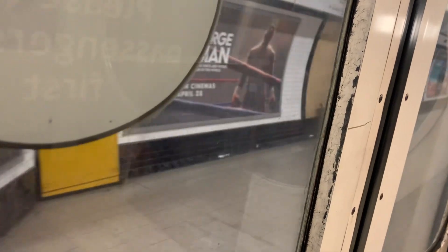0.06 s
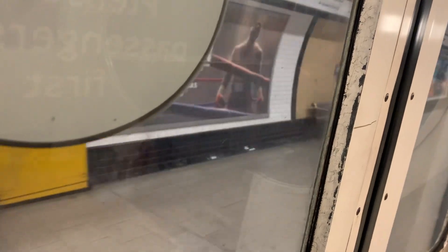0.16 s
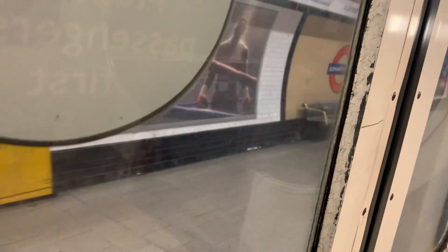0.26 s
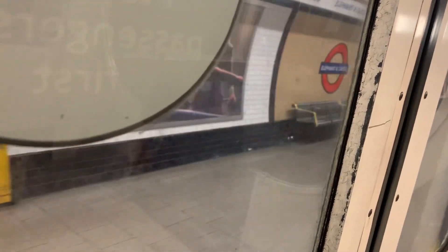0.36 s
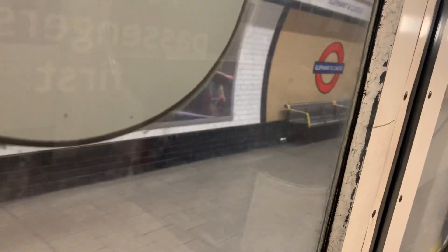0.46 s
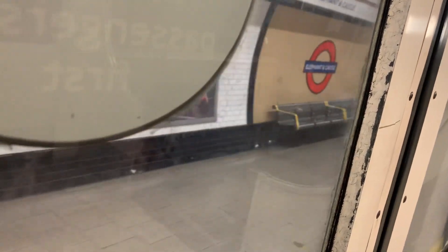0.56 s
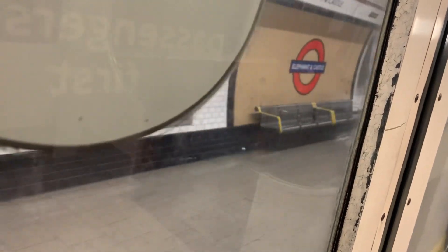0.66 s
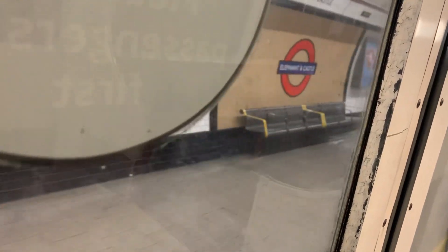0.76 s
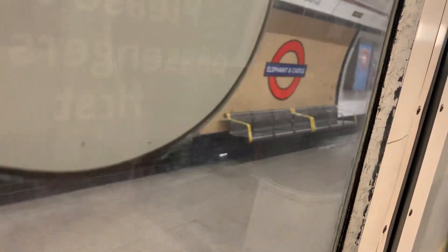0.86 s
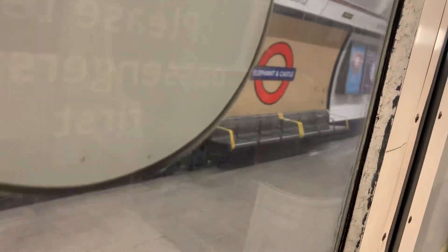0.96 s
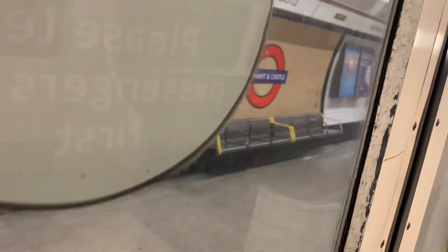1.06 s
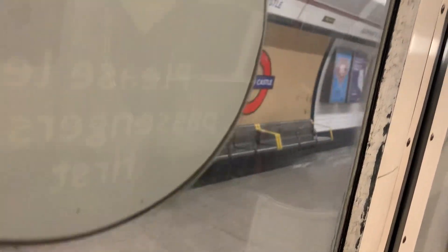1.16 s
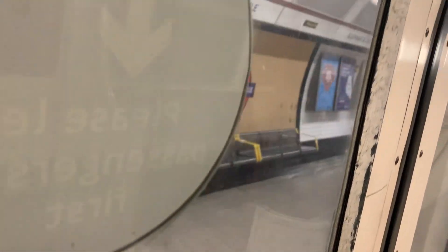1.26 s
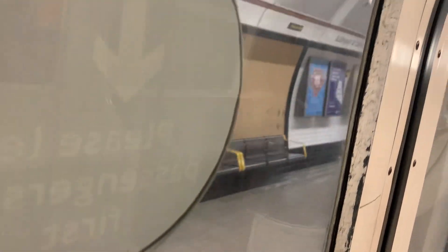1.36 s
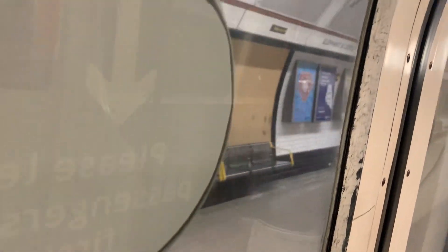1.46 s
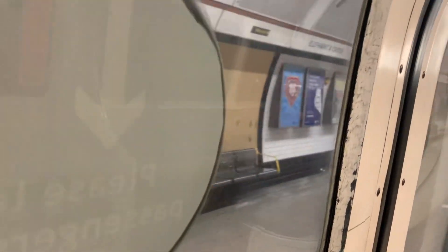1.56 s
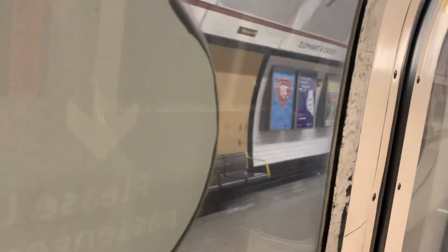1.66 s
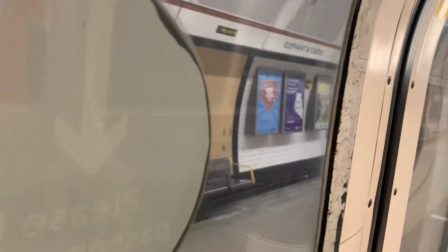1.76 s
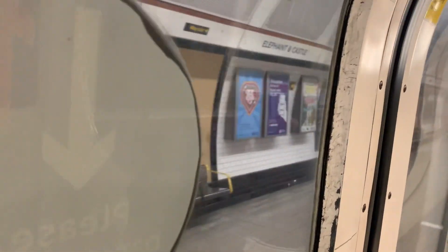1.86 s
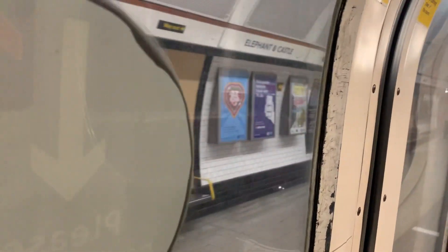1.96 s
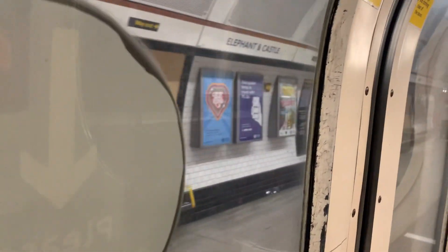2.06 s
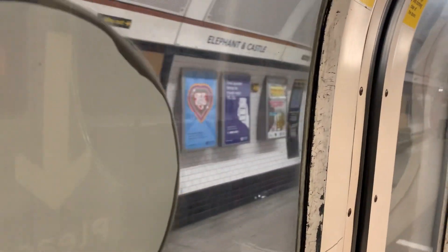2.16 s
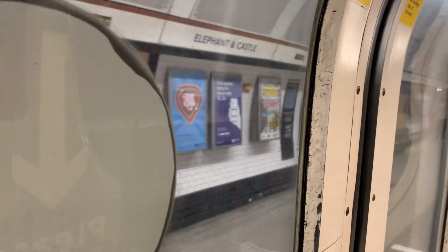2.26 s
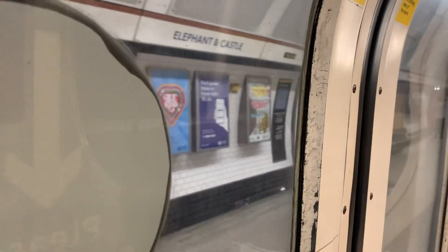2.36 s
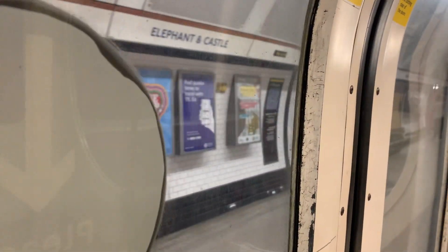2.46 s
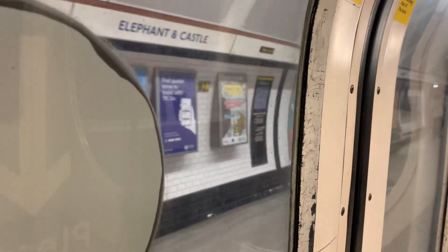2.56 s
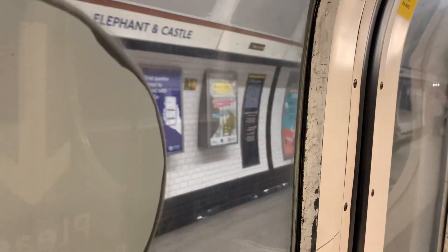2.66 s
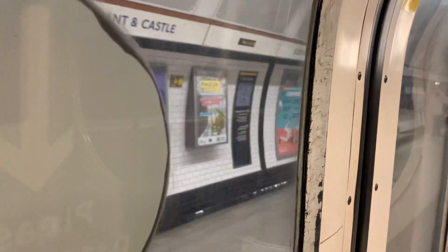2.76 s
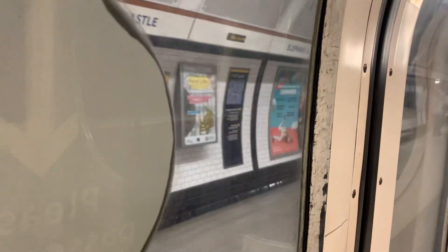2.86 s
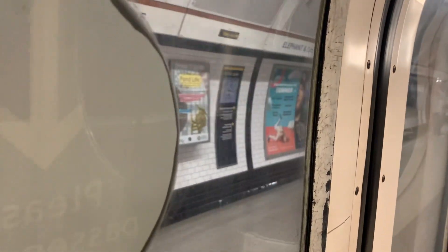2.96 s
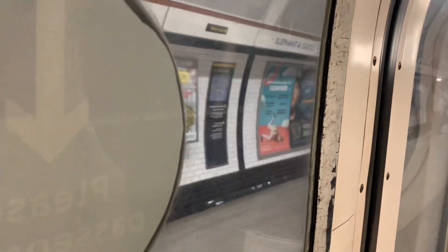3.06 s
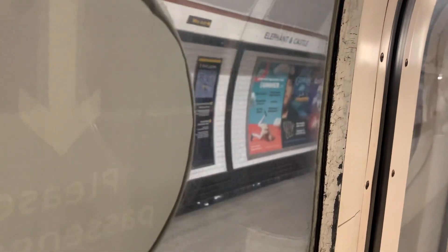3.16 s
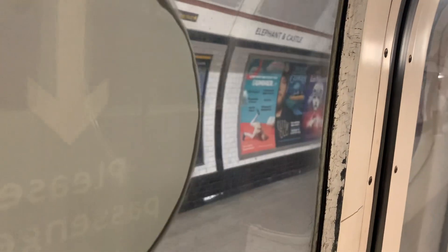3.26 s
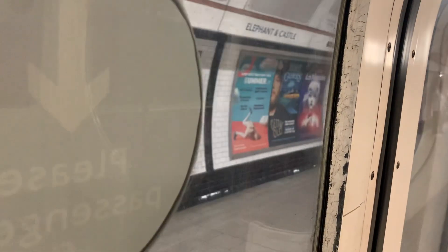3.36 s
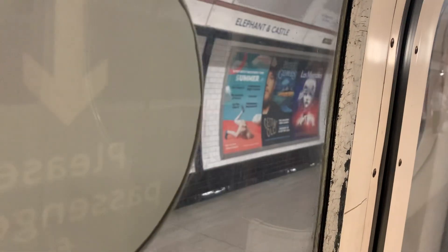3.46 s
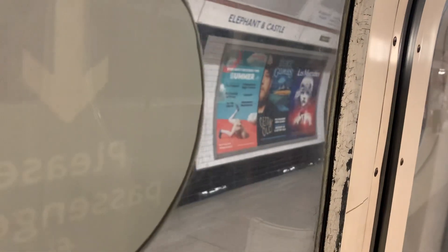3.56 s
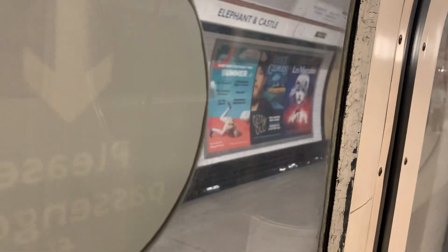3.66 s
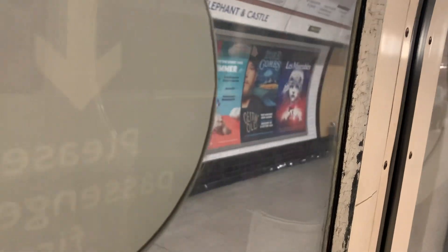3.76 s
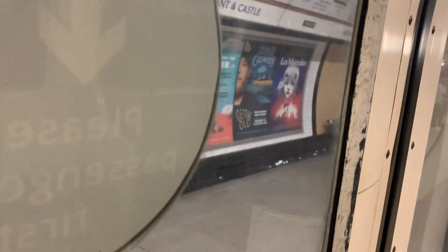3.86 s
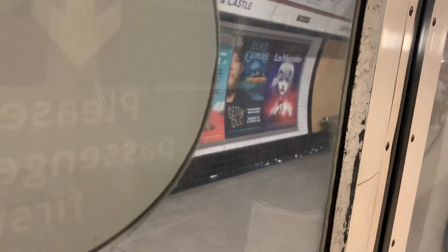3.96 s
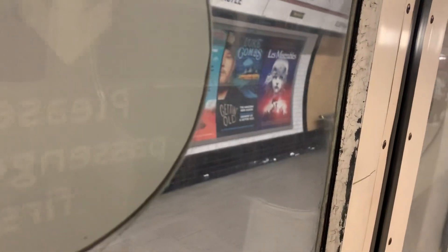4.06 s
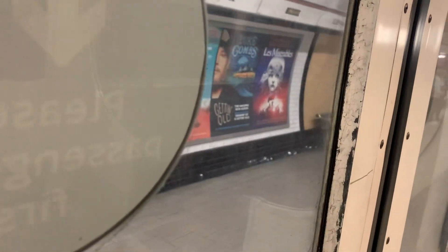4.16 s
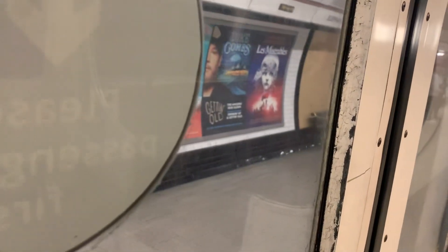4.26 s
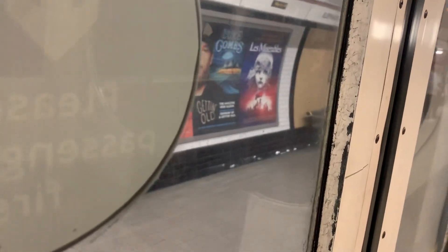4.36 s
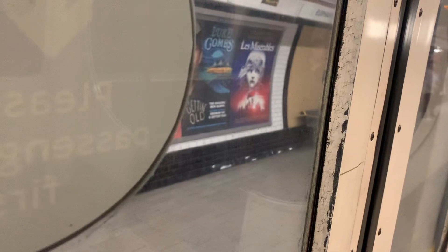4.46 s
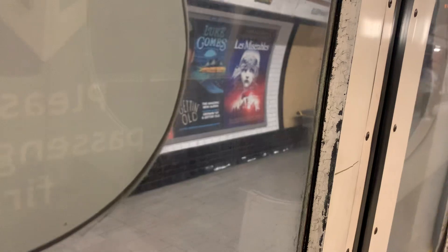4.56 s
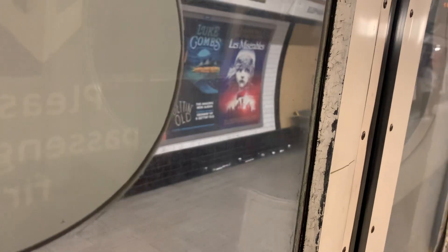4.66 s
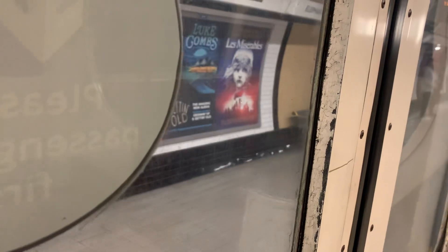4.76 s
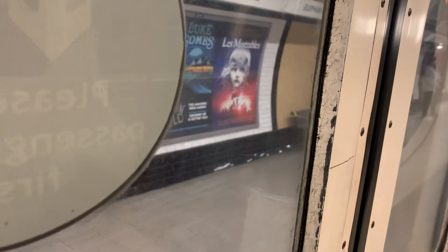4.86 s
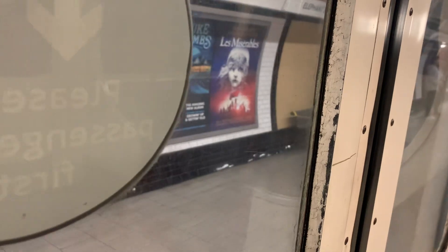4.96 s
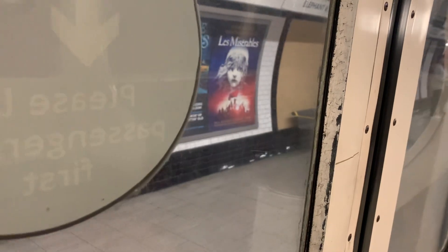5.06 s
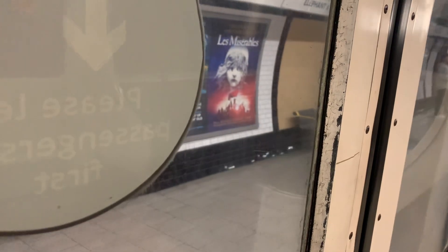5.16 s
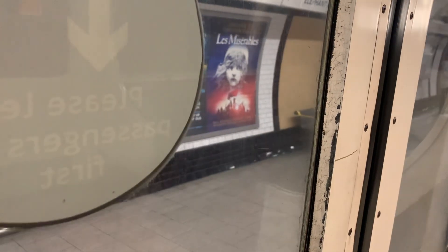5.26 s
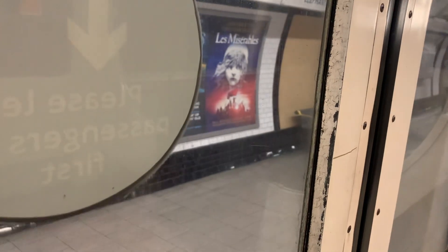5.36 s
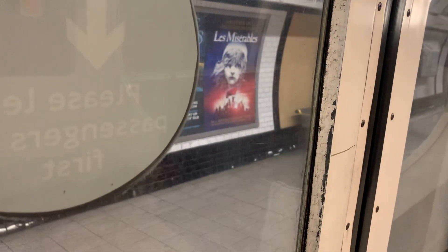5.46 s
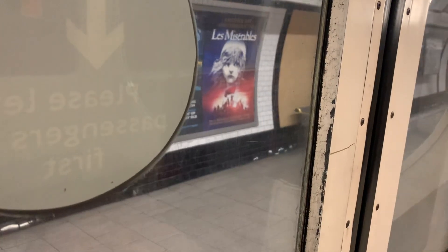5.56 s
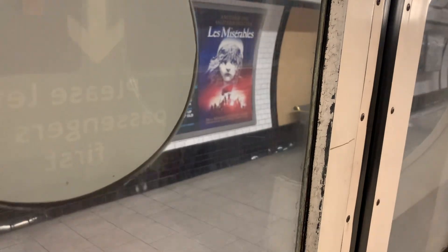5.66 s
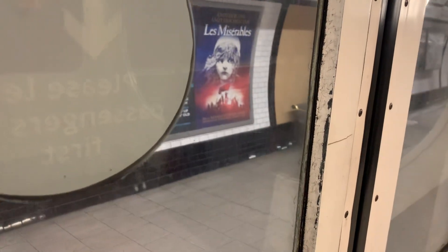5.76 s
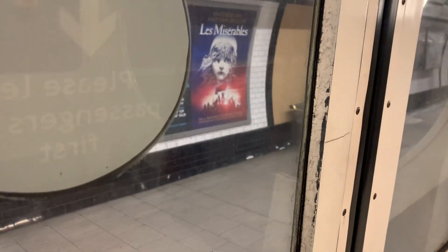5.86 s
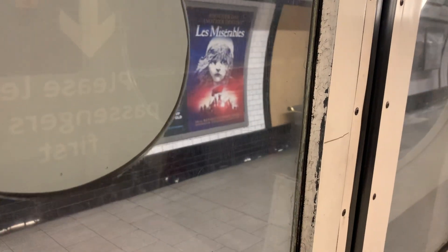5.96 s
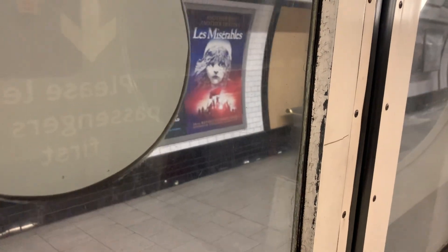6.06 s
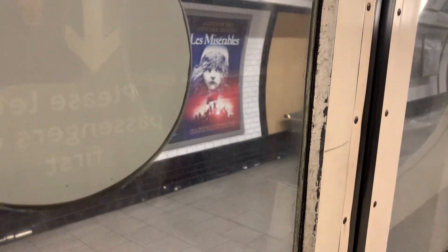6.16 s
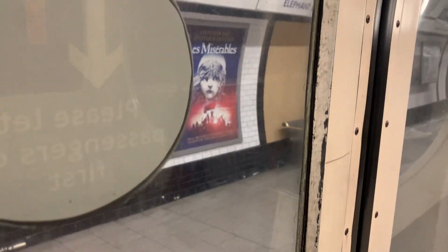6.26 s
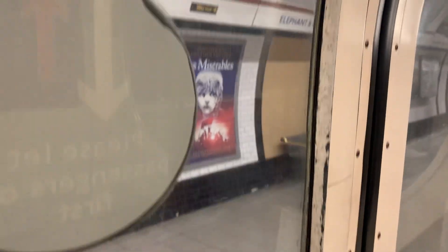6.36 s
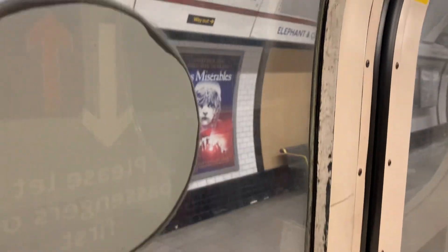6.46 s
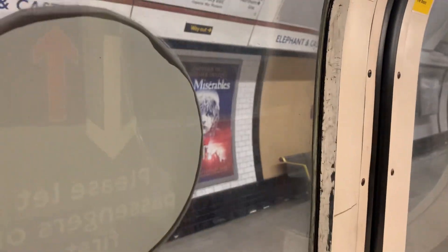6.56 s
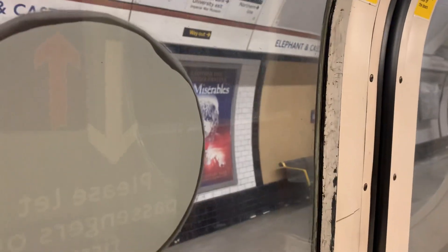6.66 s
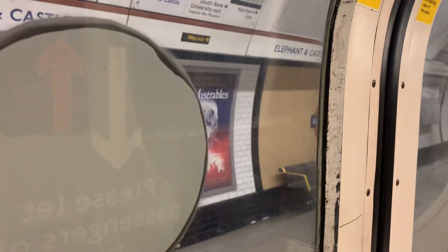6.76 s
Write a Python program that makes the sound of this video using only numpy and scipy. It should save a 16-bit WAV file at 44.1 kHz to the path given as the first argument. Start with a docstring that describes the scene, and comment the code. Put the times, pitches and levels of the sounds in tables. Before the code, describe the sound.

Inside a metro carriage pulling into a station, close handheld stereo microphone. Deep wheel boom comes through the floor, with dull joint thuds and rattling panels clustered between one and two seconds. The uneven low rumble surges just after two, then fades as the train slows. Short thin brake squeaks sing near five seconds. Ventilation rush, unsteady hum and small hissing puffs of air continue, ending with a breathier puff.

```python
"""Inside a metro carriage braking to a halt, on a handheld pair of microphone ports that hear it a little apart.
At first the wheels boom through the floor, joints thud, jolts drum the panels, and one thin squeak sounds.
The uneven low rumble then fades, and near five seconds the brake blocks sing short notes.
Ventilation noise, equipment tones and seeping air run throughout, with puffs of air and a last breathier one.
Rumble, panels and air are filtered noise, part of the rumble and the squeaks sines, the hum narrow noise bands."""
import sys
import numpy as np
from scipy import signal
from scipy.fft import rfft, irfft, next_fast_len
from scipy.io import wavfile
from scipy.ndimage import uniform_filter1d, map_coordinates

SR = 44100
rng = np.random.default_rng(int(sys.argv[2]) if len(sys.argv) > 2 else 0)


def unload_audio(sound):
    """Save the sound as a 16-bit wav file, at the path given as the first command line argument."""
    columns = np.transpose(np.atleast_2d(sound))
    # keep every value between -1 and 1, then stretch to whole-number steps
    steps = np.round(np.clip(columns, -1, 1) * 32767)
    wavfile.write(sys.argv[1], SR, steps.astype(np.int16))


def invert_db(level):
    """Linear amplitude ratio for a level in decibels (20 dB per decade), elementwise."""
    return 10 ** (np.asarray(level, dtype=float) / 20)


N = 300314  # samples


# Roughness force of wheel on rail, dying with the speed: time_s, force_db
ROLLING_FORCE = [(0, -12), (.4, -17.5), (.75, -14), (1.1, -13.5), (1.55, -13.5), (1.85, -14.5),
                 (2.37, -20.5), (2.55, -18), (3.1, -19.5), (3.35, -22), (3.65, -22), (3.85, -21),
                 (4.15, -22.5), (4.5, -29.5), (4.7, -28), (5.2, -41), (5.9, -33), (6.81, -40)]
# Modes of the floor underfoot: pitch_hz, width_hz, relative_db
FLOOR_MODES = [(55, 13, -24), (65.5, 11, -3.5), (82, 18, -8), (101.6, 25, -5)]
# Modes of the air in the carriage: pitch_hz, width_hz, relative_db
CABIN_MODES = [(132.5, 25, 1.5), (167.8, 20, -1), (193.1, 18, -2), (223, 27, -12.5)]
# Speed of the train: time_s, share of the entry speed
TRAIN_SPEED = [(0, 0.93), (1.8, 0.94), (2.3, 0.77), (3.2, 0.44), (5, 0.19), (6.81, 0.13)]
# The body on its springs: pitch_hz, width_hz, relative_db
SWAY_MODES = [(52, 23, 0)]
# Lurching of the body under braking: time_s, level_db
LURCH_LEVEL = [(0, -37), (.9, -38), (1.15, -23), (1.9, -44), (2.7, -26), (3.7, -43), (4.2, -25.5),
               (4.8, -43), (5.6, -32.5), (6.2, -61), (6.81, -54)]


def wheels():
    """Rough rail contact drives the carriage's low booming modes; braking makes the body lurch."""
    floor_gain = invert_db(track(ROLLING_FORCE) - 8)
    floor = floor_gain * steadied(diffuse(resonant(FLOOR_MODES), patchy_db=0.6))

    # slower wheels shake the cabin modes less: 6.5 dB per halving of speed
    speed_gain = invert_db(6.5 * np.log2(track(TRAIN_SPEED) + 0.0073))
    rolling_gain = driven(full_db=-19.5, slope=0.32) * speed_gain
    idle_gain = invert_db(-36)  # kept up by the equipment
    cabin_gain = np.hypot(rolling_gain, idle_gain) * invert_db(0.37 * wobble(3.96))
    cabin = cabin_gain * diffuse(resonant(CABIN_MODES), patchy_db=1.0)

    lurching = invert_db(track(LURCH_LEVEL)) * diffuse(resonant(SWAY_MODES), patchy_db=2.5)
    return floor + cabin + lurching


def driven(full_db, slope):
    """Gain following the rolling force: full_db at a force of -15 dB, slope in dB per dB of force."""
    return invert_db(full_db + slope * (track(ROLLING_FORCE) + 15))


# Uneven low booming near 70-103 Hz: time_s, pitch_hz, level_db
UNEVEN_BOOMING = [(0.0, 82.4, -14.5), (0.36, 83.3, -19), (0.4, 86.9, -19), (0.51, 89.8, -30),
                  (0.53, 88.3, -17), (0.72, 83.5, -18), (0.78, 87.5, -15.5), (0.83, 97.2, -26.5),
                  (0.93, 103.2, -17), (1.03, 98.0, -19.5), (1.1, 87.1, -16), (1.32, 87.1, -18),
                  (1.38, 91.7, -14), (1.42, 87.1, -22.5), (1.54, 82.18, -21.5), (1.73, 90.55, -18.5),
                  (1.85, 81, -12.5), (1.89, 81.7, -22), (1.91, 81.1, -13), (1.98, 82.5, -30),
                  (2.0, 80.5, -6.5), (2.03, 74.6, -28), (2.09, 73.4, -9), (2.1, 72.9, -17.5),
                  (2.21, 82.0, -12.5), (2.24, 81.1, -24), (2.3, 82.1, -9), (2.34, 82, -27),
                  (2.37, 79.2, -7), (2.45, 75.3, -27), (2.53, 73.6, -17), (2.59, 69.96, -24.5),
                  (2.74, 70.9, -18), (2.9, 75.3, -24), (2.95, 88.7, -19.5), (3.01, 91.6, -21),
                  (3.05, 86.3, -38), (3.1, 79.7, -19), (3.19, 93.0, -21), (3.23, 91.5, -35),
                  (3.3, 81.6, -19.5), (3.41, 86.9, -39), (3.44, 88, -15), (3.48, 92.5, -24.5),
                  (3.56, 92.4, -20), (3.63, 83.8, -24.5), (3.66, 83.9, -17.5), (3.9, 85.34, -24),
                  (4.12, 80.9, -27), (4.34, 86.16, -31), (4.41, 94.8, -31), (4.5, 82.4, -30.5),
                  (4.73, 82.8, -23.5), (4.82, 82.8, -51), (4.85, 82.7, -27.5), (5.0, 79.2, -34.5)]


def uneven_boom():
    """A sine that wavers in pitch and level stands for part of the uneven low rumble, until about 5 s."""
    rows = np.array(UNEVEN_BOOMING)
    hz = track(rows[:, [0, 1]]) + 2.545 * wobble(14)
    level_db = track(rows[:, [0, 2]]) + 0.48 * wobble(18)
    after_last_s = np.maximum(np.arange(N) / SR - rows[-1, 0], 0)
    dying = invert_db(-40 * after_last_s)
    phase = 2 * np.pi * np.cumsum(hz) / SR + left_lead(82) * np.array([[.5], [-.5]])
    port_db = np.array([[-2.1], [1.7]])  # left, right
    return np.sqrt(2) * invert_db(level_db + port_db) * dying * np.sin(phase)


# Wheels striking rail joints: start_s, strength_db, pitch_hz
JOINT_KNOCKS = [(.68, -9, 141), (1.104, -4.5, 97), (1.152, -9, 150), (1.2, -11, 99), (1.303, -4, 152),
                (1.322, -15, 420.6), (1.35, -13.5, 260), (1.545, -13.5, 195), (1.627, -8, 130),
                (1.819, -14, 332.7), (1.846, -11, 255.2), (1.876, -25, 348), (1.903, -16, 200),
                (1.945, -17, 318), (1.993, -9, 110), (2.28, -16, 170), (2.6, -21, 150.7),
                (2.69, -18, 149.5)]


def knocks():
    """Each joint gives a short dull thud through the floor and a crack in the fittings."""
    thud_cycles, crack_db, crack_fall_s = 1.16, -20, 0.0098  # crack relative to the thud
    thuds, cracks = np.zeros(N), np.zeros(N)
    t = np.arange(SR // 8) / SR
    for start_s, strength_db, hz in JOINT_KNOCKS:
        here = slice(round(start_s * SR), round(start_s * SR) + len(t))
        u = t * hz / thud_cycles
        envelope = 2 * u * np.exp(1 - 2 * u)  # rises to 1, then dies
        thuds[here] -= invert_db(strength_db) * np.sin(2 * np.pi * hz * t) * envelope
        cracks[here] += invert_db(strength_db + crack_db) * np.exp(-t / crack_fall_s)
    port_gain = invert_db([[-1.8], [1.8]])  # left, right
    return thuds * port_gain + cracks * fittings(patchy_db=0.0)


# Rattle of windows and fittings: frequency_hz, relative_db
RATTLE_SPECTRUM = [(400, -8.5), (650, 1.5), (900, 1), (1400, -8.5), (2000, -11), (3700, -21.5), (6500, -33),
                   (8500, -46), (11000, -120)]


def fittings(patchy_db):
    """Loose fittings chatter as noise, lifted where the wall panels ring."""
    return diffuse(ringing(RATTLE_SPECTRUM), patchy_db)


# Rail joints and lurches: start_s, hold_s, drumming_db, rattle_db
BODY_JOLTS = [(0.127, 0.12, -31, -35), (1.03, 0.06, -27, -38.5), (1.109, 0.055, -22.5, -30),
              (1.22, 0.049, -32, -33.5), (1.298, 0.033, -21, -35), (1.357, 0.04, -35, -40),
              (1.603, 0.074, -30.5, -41), (1.818, 0.17, -28, -34)]
# Drumming of walls and doors: frequency_hz, relative_db
DRUM_SPECTRUM = [(120, -23), (220, 1), (320, 5), (430, 4), (560, -8.5), (750, -26), (1500, -120)]


def panels():
    """Walls and doors drum with the rolling and every jolt; windows and fittings rattle higher up."""
    rise_s, fall_s = 0.004, 0.059
    jolts = np.array(BODY_JOLTS)
    thumps = bursts(jolts[:, [0, 1, 2]], rise_s, fall_s)
    clatter = bursts(jolts[:, [0, 1, 3]], rise_s, fall_s)
    drum_gain = np.hypot(driven(full_db=-29.5, slope=0.75), thumps)
    drum = drum_gain * diffuse(ringing(DRUM_SPECTRUM), patchy_db=1.07)
    rattle_gain = np.hypot(driven(full_db=-39, slope=0.4), clatter)
    return drum + rattle_gain * fittings(patchy_db=2.0)


# Ringing of the wall panels: pitch_hz, width_hz, lift_db
WALL_RINGS = [(302, 72, 4.5), (337.2, 4.3, 5), (411.3, 18, 3.5), (474.5, 7.1, 11), (536, 24, 4.5),
              (652, 20, 4), (733, 12, 4), (934, 23, 7), (1058, 15, 3)]


def ringing(spectrum):
    """Gain of a spectrum lifted where the wall panels ring."""
    def gain(hz):
        lift_db = sum(db / (1 + (2 * (hz - centre) / width) ** 2) for centre, width, db in WALL_RINGS)
        return invert_db(along(spectrum, hz) + lift_db)
    return gain


# Notes of the brake blocks: start_s, length_s, start_hz, end_hz, level_db
BRAKE_SQUEAKS = [(1.24, .12, 6583, 6583, -63), (4.843, .038, 4470, 4470, -57),
                 (4.968, .042, 4056, 4056, -43), (5.005, .03, 4050, 4050, -53),
                 (5.026, .04, 4050, 4056, -47.5), (5.055, .05, 4056, 4070, -57),
                 (5.1, .035, 4080, 4120, -59), (5.11, .035, 4600, 4600, -59),
                 (5.155, .045, 3680, 3760, -57), (5.18, .035, 3820, 3870, -56),
                 (5.21, .035, 3850, 3800, -58), (5.28, .035, 3920, 3920, -55)]


def brake():
    """Brake blocks grip and slip, singing thin short notes."""
    out = np.zeros((2, N))
    for start_s, *shape in BRAKE_SQUEAKS:
        sound = note(*shape)
        start = round(start_s * SR)
        out[:, start:start + sound.shape[1]] += sound
    return out


def note(length_s, start_hz, end_hz, level_db):
    """One short tone, steady or gliding, that swells and breaks off, as both ports hear it."""
    u = np.arange(int(length_s * SR)) / (length_s * SR)  # 0 to 1 through the note
    phase = 2 * np.pi * length_s * (start_hz * u + (end_hz - start_hz) * u ** 2 / 2)
    lead = left_lead(start_hz) / 2
    swell = np.sin(np.pi * u ** 1.8) ** 0.7
    return np.sqrt(2) * invert_db(level_db) * swell * np.sin(phase + np.array([[lead], [-lead]]))


# Air seeping between the puffs: time_s, flow_db
AIR_LEAK = [(0, -55), (.7, -60), (2.4, -56), (3.1, -62.5), (4.2, -60), (5, -63), (6.5, -61.5),
            (6.81, -59.5)]
# Puffs of escaping air: start_s, hold_s, flow_db
AIR_PUFFS = [(.13, 0.036, -53.5), (.26, 0.015, -54), (1.03, .01, -56), (1.09, 0.073, -49), (1.2, .05, -56),
             (1.27, 0.041, -51), (1.635, 0.063, -54), (1.75, .04, -56), (1.815, 0.06, -49.5),
             (1.92, 0.036, -48.5), (2.16, 0.04, -56), (2.72, 0.036, -60.5), (3.18, 0.043, -59),
             (3.57, 0.017, -58), (3.736, 0.048, -47), (3.925, .02, -54.5), (5.43, .02, -61),
             (6.562, 0.026, -56)]
# Hiss of the escaping air: frequency_hz, relative_db
JET_SPECTRUM = [(2000, -46), (4000, -6), (6500, -8.5), (8500, -2.5), (9800, -4), (11500, -4),
                (13500, -17.5), (14500, -27), (16000, -70)]
# Sharp edge of the harder puffs: frequency_hz, relative_db
EDGE_SPECTRUM = [(11500, -41), (12400, 2), (13500, -2), (14300, -7), (15200, -26), (16000, -60)]
# A lower, breathier puff: start_s, hold_s, level_db
VALVE_PUFF = [(6.681, 0.03, -42)]
# Hiss of that lower puff: frequency_hz, relative_db
LOW_JET_SPECTRUM = [(2200, -1), (3000, 2), (3600, -4), (4300, 2), (5300, 2), (5900, -9), (6600, -15),
                    (7500, -28.5), (9000, -120)]


def air():
    """Compressed air seeps and escapes in short, slightly spluttering puffs; the harder ones gain a sharp edge."""
    puffs = bursts(AIR_PUFFS, rise_s=0.0079, fall_s=0.07)
    splutter = invert_db(0.43 * wobble(40) + 0.98 * wobble(8.9))
    flow = np.hypot(invert_db(track(AIR_LEAK)), puffs) * splutter
    hiss = flow * diffuse(coloured(JET_SPECTRUM), patchy_db=0.5)
    edge_gain = invert_db(-58.0) * (flow / invert_db(-46.5)) ** 1.9  # grows 1.9 dB per dB of flow
    edge = edge_gain * diffuse(coloured(EDGE_SPECTRUM), patchy_db=2.0)
    valve_gain = bursts(VALVE_PUFF, rise_s=0.0062, fall_s=0.029)
    return hiss + edge + valve_gain * diffuse(coloured(LOW_JET_SPECTRUM), patchy_db=0.4)


# Rush of the ventilation: frequency_hz, relative_db
VENT_SPECTRUM = [(15, -38), (30, -7), (55, -3.5), (110, -3), (150, -1.5), (205, -9), (290, -6), (370, -11),
                 (480, -10), (620, -15), (800, -15.5), (1030, -15), (1350, -20), (2300, -23.5),
                 (2900, -30.5), (3400, -29), (5000, -40.5), (7000, -41.5), (9000, -45.5), (11000, -86),
                 (13000, -56), (14500, -73), (15500, -100)]


def equipment():
    """The steady rush of ventilation: broad noise whose level wavers slightly."""
    level_db = -30 + 0.17 * wobble(4.14) + 0.13 * wobble(11)
    return invert_db(level_db) * diffuse(ringing(VENT_SPECTRUM), patchy_db=0.36)


# Equipment tones: pitch_hz, width_hz, level_db, left_lead_rad, level change in dB per dB of load
EQUIPMENT_TONES = [(51.9, 5.2, -45, -.4, 2.5), (166, 6.1, -35.5, -0.53, -0.16), (235.8, 5.4, -39, 2, -.6),
                   (426, 8, -42.5, 0.1, 1), (472, 6.1, -38.5, 3, 0.5), (635, 5.8, -47, -1.5, 0.8),
                   (950, 8.9, -45.5, 2, 1), (1039, 6, -48.5, 1, -1), (1060, 7.8, -49, 1.4, .6)]
# Braking load on the equipment: time_s, load_db
BRAKING_LOAD = [(0, -1), (2.3, -1), (2.7, 2), (5, 0), (5.3, -2.5), (6.81, -4.5)]


def hum():
    """Unsteady equipment tones, each following the braking load up or down by its own share."""
    load_db = track(BRAKING_LOAD)
    out = np.zeros((2, N))
    for hz, width_hz, level_db, lead, follows in EQUIPMENT_TONES:
        out += invert_db(level_db + follows * load_db) * wavering(hz, width_hz, lead, alike=0.77)
    return out


def wavering(hz, width_hz, lead, alike):
    """An unsteady tone: a narrow band of noise around hz, alike (0-1) at the two ports."""
    reach = max(int(SR / width_hz / 2), 1)
    z = rng.standard_normal((2, N)) + 1j * rng.standard_normal((2, N))
    shared, own = smoothed(z.real, reach) + 1j * smoothed(z.imag, reach)
    turn = np.arccos(alike) / 2
    slow = np.array([np.cos(turn) * shared + side * np.sin(turn) * own for side in (1, -1)])
    slow = slow / np.abs(slow) ** 0.13  # evens out the swells a little
    phase = 2 * np.pi * hz * np.arange(N) / SR + np.array([[lead / 2], [-lead / 2]])
    tone = (slow * np.exp(1j * phase)).real
    return tone / tone.std()


def grainy(x, depth_db):
    """Random narrow peaks and dips, slowly changing, give the noise a grainy texture."""
    hz, _, z = signal.stft(x, SR, nperseg=1024)
    depth = depth_db * hz / (hz + 600)  # shallower in the bass
    ripple = invert_db(depth[:, None] * patches(z.shape[1:], bins=2, frames=8))
    ripple = ripple / np.sqrt(np.mean(ripple ** 2, 1, keepdims=True))
    return signal.istft(z * ripple, nperseg=1024)[1][:, :N]


# How the two ports hear diffuse sound:
# frequency_hz, likeness (0-1), left_lead_rad apart from the path lag, left_minus_right_db
PORT_PAIR = [(40, 0.98, -0.4, -2.6), (130, 1, -0.45, -4.4), (200, 0.9, 0.15, -3.5),
             (359, 0.76, -0.02, -1.5), (544, 0.29, 1, 2), (756, 0.4, 2, -1), (1035, 0.62, 2.5, -0.1),
             (1450, 0.04, 2, 0), (1890, 1, 0.64, -1.3), (2350, 0.36, 2, -1), (3060, 0.08, -0.2, -1),
             (4300, 0.32, -0.34, -0.5), (4970, 0.6, -0.6, -3), (6120, 0.32, -0.2, -1.5),
             (7170, 1, -0.18, 0.2), (9000, 1, 0, 0)]


def diffuse(gain, patchy_db):
    """Noise from all around, with patches of random strength, as the two ports hear it, at rms 1."""
    z = signal.stft(rng.standard_normal((2, N)), nperseg=512)[2]
    field = patches(z.shape[1:], bins=5, frames=10)
    pair = signal.istft(z * invert_db(patchy_db * field), nperseg=512)[1][:, :N]
    size = next_fast_len(N + 8192)
    hz = np.fft.rfftfreq(size, 1 / SR)
    shared, own = rfft(pair, size) * gain(hz)
    turn = np.arccos(np.clip(along(PORT_PAIR, hz), 0, 1)) / 2
    # half of the lead and level difference goes to each side
    skew = np.exp(.5j * left_lead(hz)) * invert_db(along(PORT_PAIR, hz, order=3) / 2)
    left = (np.cos(turn) * shared + np.sin(turn) * own) * skew
    right = (np.cos(turn) * shared - np.sin(turn) * own) / skew
    return unit(irfft([left, right], size)[:, :N])


def left_lead(hz):
    """Phase in rad by which the left port leads; its path is longer by a fixed lag."""
    lag_s = 0.000216
    return along(PORT_PAIR, hz, order=2) - 2 * np.pi * hz * lag_s


def coloured(spectrum):
    """Gain of a (frequency_hz, relative_db) spectrum."""
    return lambda hz: invert_db(along(spectrum, hz))


def resonant(modes):
    """Gain of (pitch_hz, width_hz, db) resonances, each applied twice so that the valleys stay dark."""
    def gain(hz):
        power = 0
        for centre, width, db in modes:
            damping = (hz * width) ** 2
            response = damping / ((centre ** 2 - hz ** 2) ** 2 + damping)
            power = power + (invert_db(db) * response) ** 2
        return np.sqrt(power)
    return gain


def bursts(rows, rise_s, fall_s):
    """Gain of (start_s, hold_s, level_db) events that swell, hold and die away; their powers add."""
    t = np.arange(N) / SR
    power = np.zeros(N)
    for start_s, hold_s, level_db in rows:
        rise = np.minimum(t - start_s, 0) / rise_s
        fall = np.maximum(t - start_s - hold_s, 0) / fall_s
        power += (invert_db(level_db) * np.exp(rise - fall)) ** 2
    return np.sqrt(power)


def steadied(x):
    """Partly even out the slow chance swells of a noise."""
    share, window_s = 0.1, 0.1
    power = smoothed(np.mean(x ** 2, 0), int(window_s * SR))
    return unit(x / (np.abs(power) + 1e-3) ** (share / 2))


def smoothed(x, size):
    """Running mean over size samples, taken twice."""
    return uniform_filter1d(uniform_filter1d(x, size), size)


def patches(shape, bins, frames):
    """A smooth random field over frequency and time, of spread 1."""
    field = uniform_filter1d(rng.standard_normal(shape), size=bins, axis=0)
    field = uniform_filter1d(field, size=frames, axis=1)
    return field / field.std()


def wobble(rate):
    """A smooth random curve, rate knots a second."""
    return map_coordinates(rng.standard_normal(int(N * rate / SR) + 4), [np.arange(N) * rate / SR])


def track(rows):
    """One value per sample from (time_s, value) rows."""
    s, value = np.transpose(rows)
    return np.interp(np.arange(N) / SR, s, value)


def along(points, hz, order=1):
    """One column of a table, read on a log frequency axis."""
    cols = np.transpose(points)
    return np.interp(np.log(hz + 1), np.log(cols[0] + 1), cols[order])


def unit(x):
    """Scale so that the mean of the channels has rms 1."""
    return x / np.sqrt(np.mean(np.atleast_2d(x).mean(0) ** 2) + 1e-20)


def scene():
    """Everything heard in the carriage; panels, air and ventilation share a grainy texture."""
    rumble = wheels() + uneven_boom() + knocks()
    textured = grainy(panels() + air() + equipment(), depth_db=3.0)
    return rumble + textured + brake() + hum()


def roll_off(x):
    """The treble ends steeply here."""
    return signal.sosfilt(signal.butter(12, 15000, fs=SR, output="sos"), x)


def record(dry):
    """The loudest booms round off smoothly towards a ceiling in the microphone amplifier."""
    ceiling = 1.6
    mix = dry / (1 + np.abs(dry / ceiling) ** 3) ** (1 / 3)
    return roll_off(mix)


dry = scene()
out = record(dry)
unload_audio(out)
```